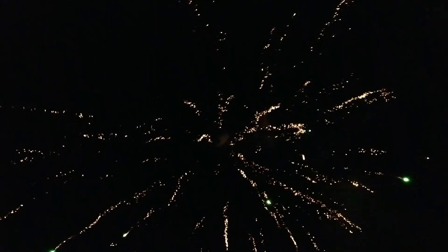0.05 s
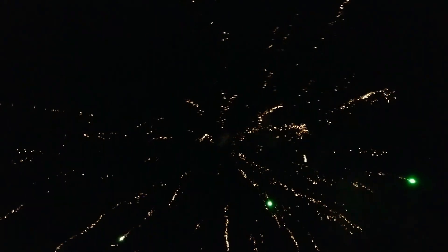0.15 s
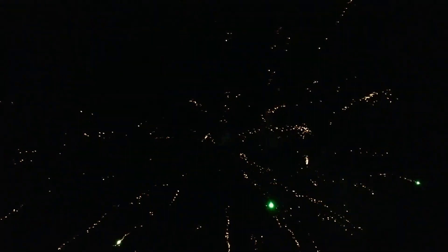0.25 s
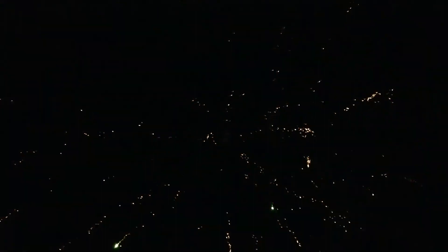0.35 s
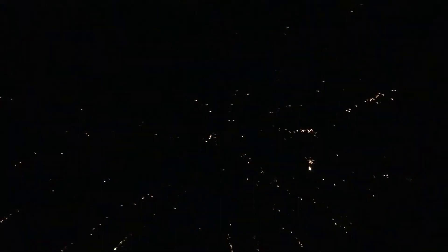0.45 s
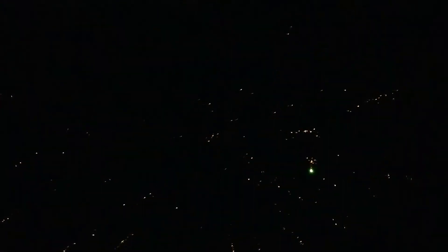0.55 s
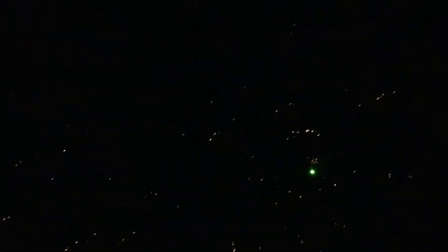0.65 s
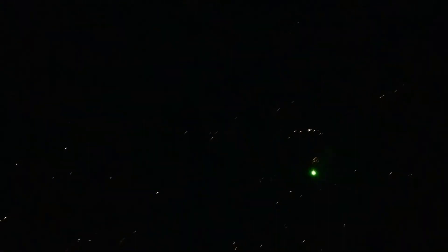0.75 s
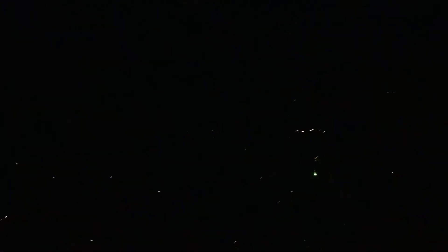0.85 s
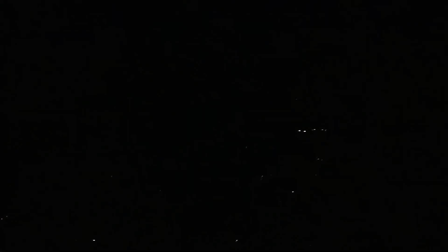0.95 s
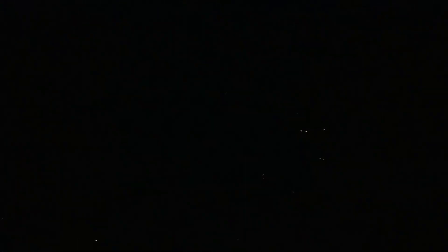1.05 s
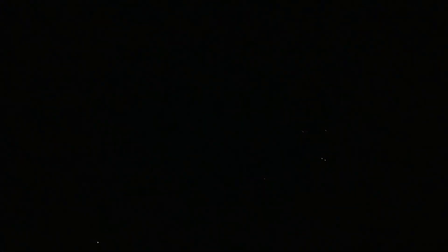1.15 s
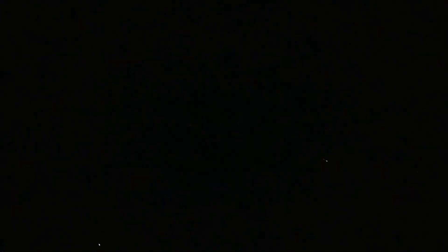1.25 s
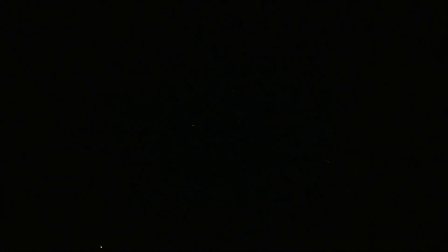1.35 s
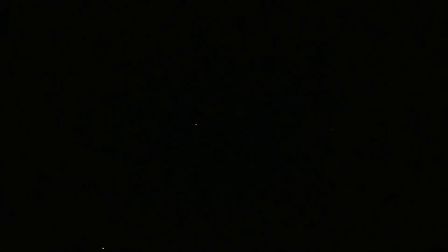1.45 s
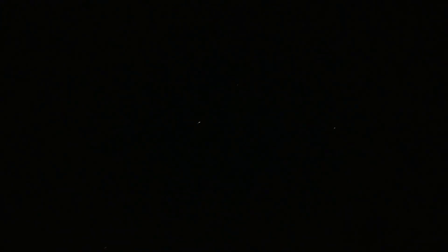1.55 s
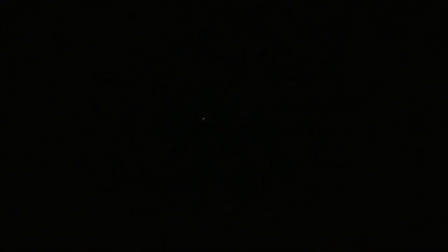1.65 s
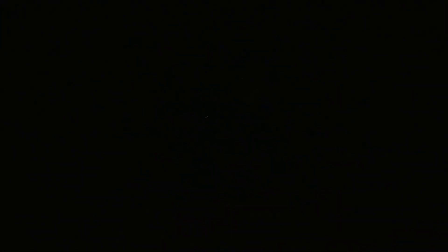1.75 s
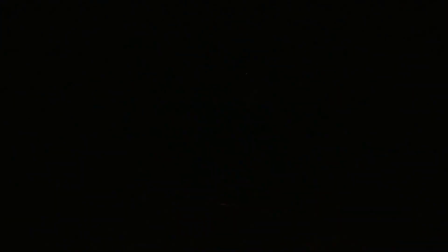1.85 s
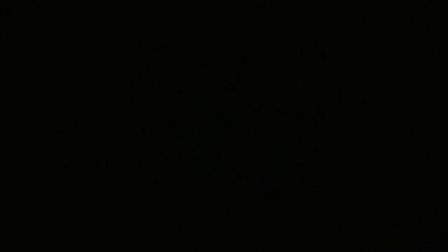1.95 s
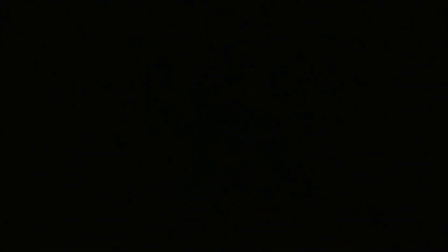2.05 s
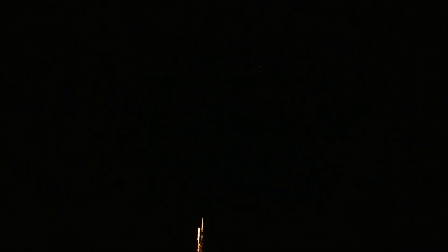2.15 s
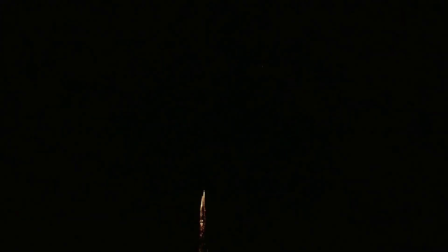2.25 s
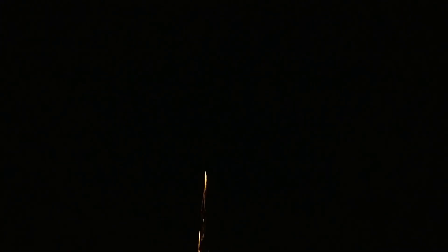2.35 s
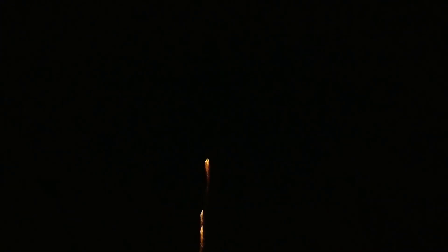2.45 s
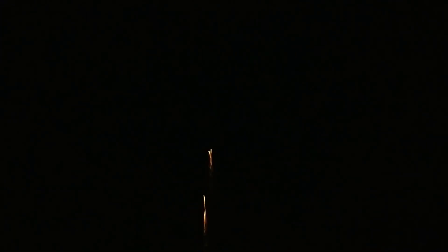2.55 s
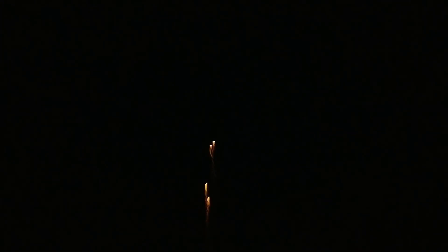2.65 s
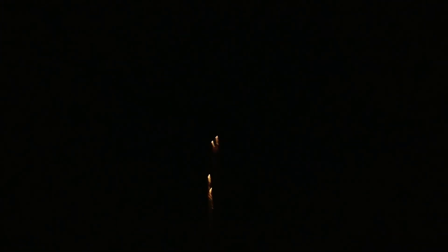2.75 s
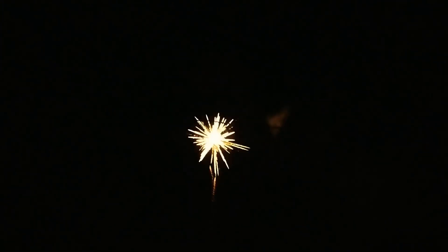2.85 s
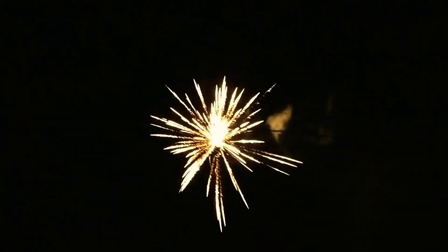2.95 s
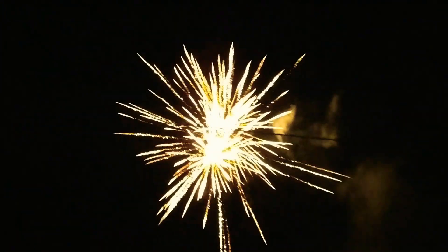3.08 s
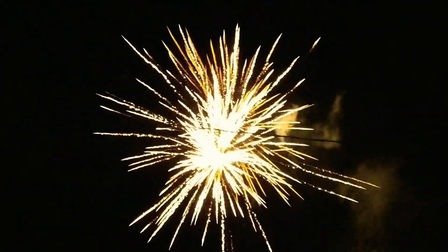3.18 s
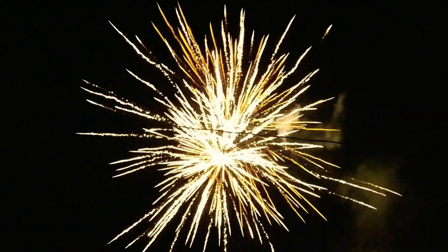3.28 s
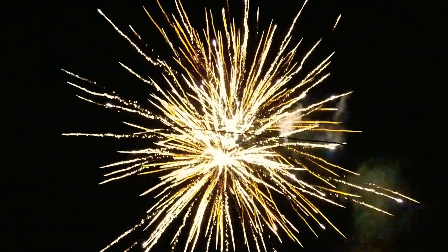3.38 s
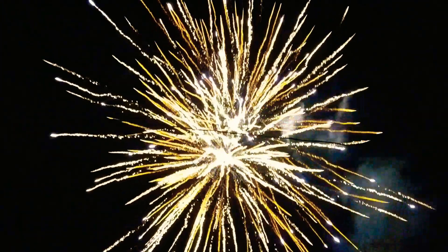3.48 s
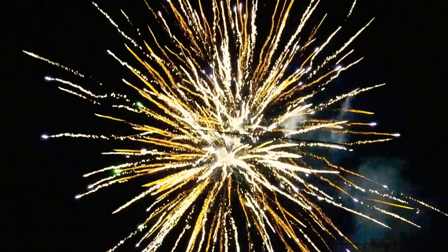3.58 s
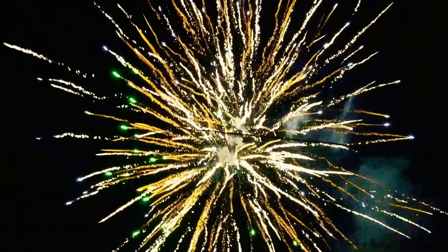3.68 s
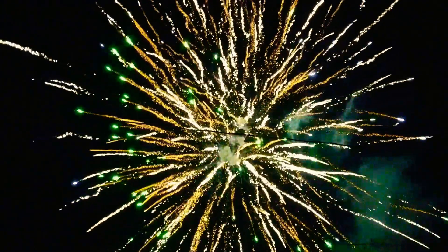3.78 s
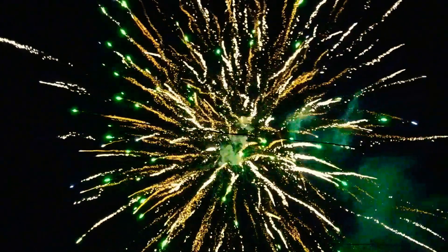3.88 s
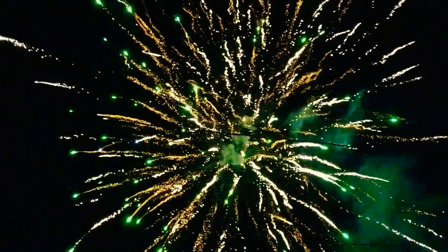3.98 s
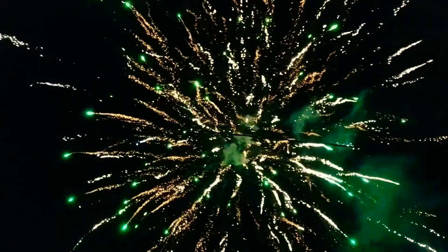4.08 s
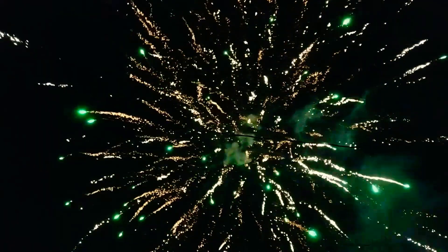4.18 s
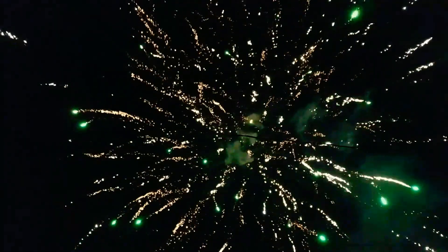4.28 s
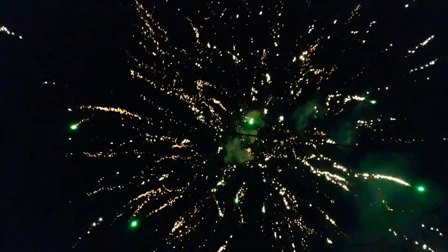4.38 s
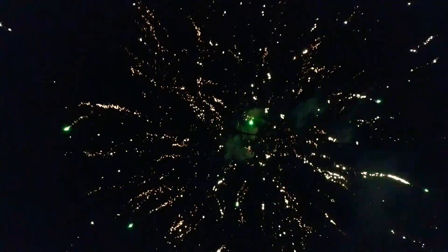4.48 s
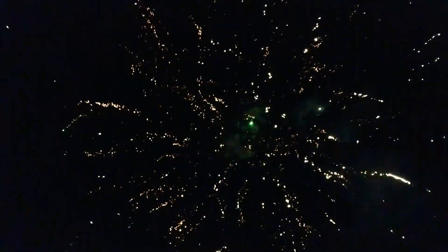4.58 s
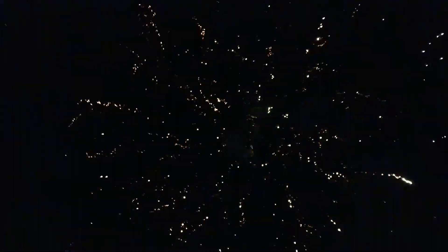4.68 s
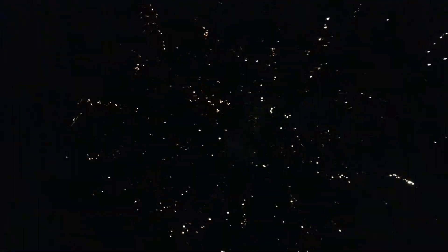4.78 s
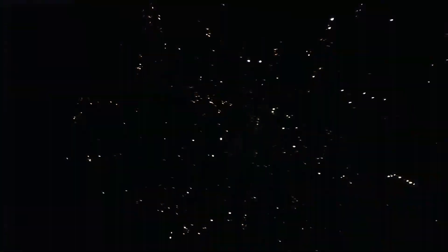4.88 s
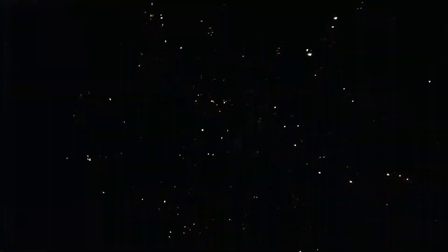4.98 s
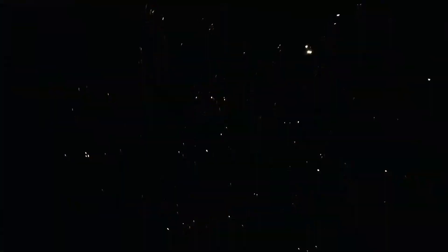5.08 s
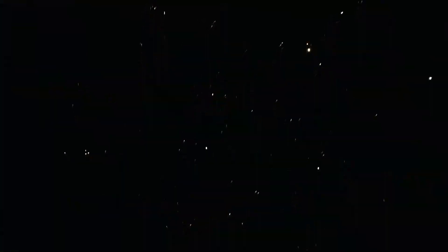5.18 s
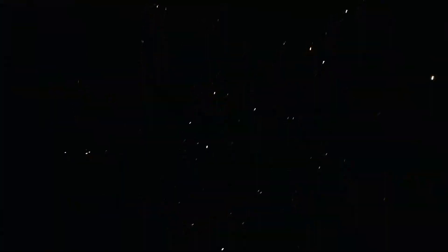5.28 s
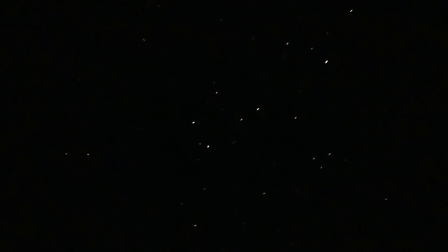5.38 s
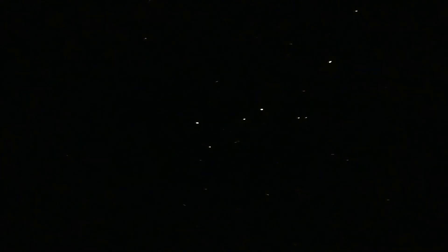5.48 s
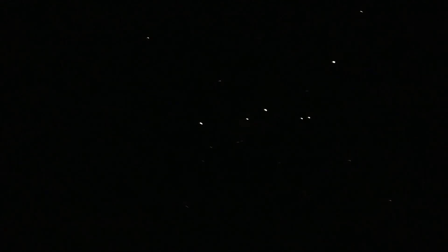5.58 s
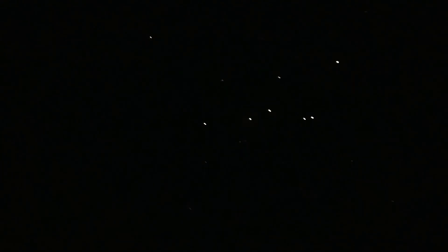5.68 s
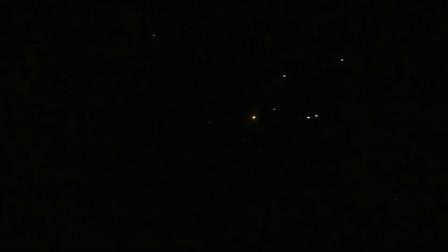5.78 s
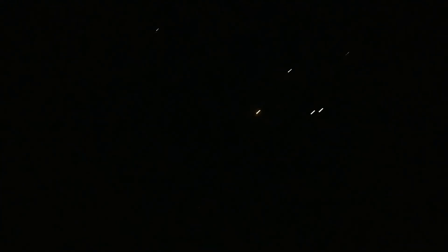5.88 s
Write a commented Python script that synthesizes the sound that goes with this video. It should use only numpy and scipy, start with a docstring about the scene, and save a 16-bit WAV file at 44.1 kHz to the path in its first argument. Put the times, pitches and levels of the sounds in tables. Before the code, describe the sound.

Night fireworks outdoors: dying rumble, a rapid run of four mortar shots, a violent cluster of distorted bangs, then long fading thunder and faint pops.

```python
"""Open country at night: four mortar tubes of a firework cake fire; a second later their shells burst overhead.
Each blast wave arrives twice, directly and off the ground; the bangs overload the microphone.
Walls answer at once as dense noise; the land rolls thunder back: it swells briefly, fades and dulls.
Burning stars and tails fizz as faint filtered noise, weak shocks pop far away, and a steady hiss lies below.
"""
import sys
import numpy as np
from scipy import signal
from scipy.fft import rfft, irfft, next_fast_len
from scipy.io import wavfile
from scipy.ndimage import uniform_filter1d

SR = 44100
rng = np.random.default_rng(int(sys.argv[2]) if len(sys.argv) > 2 else 0)


def persist_wave(psi):
    """Save psi, clipped to +-1, as 16-bit WAV."""
    counts = np.round(np.clip(psi, -1, 1) * 32767).astype(np.int16)
    wavfile.write(sys.argv[1], SR, np.atleast_2d(counts).T)


N = 261501
TIME_S = np.arange(N) / SR

# shell bursts; the first precedes the start, only its thunder is left:
# start_s [s], level_db [dB], bounce_ms [ms], bounce_share [ratio]
SHELL_BURSTS = [(-.9, 24.6, 9.4, .45), (3.0763, 28.6, 9.45, .45), (3.2123, 24, 9.7, .8),
                (3.2294, 26, 9.25, .55), (3.3344, 25, 9.35, .75)]
# mortar shots: start_s [s], level_db [dB], blast_ms [ms], bounce_ms [ms]
MORTAR_SHOTS = [(1.7656, 14, 1.8, 1.1), (1.8379, 13, 3.4, 1.45), (1.9376, 12, 3.8, 1.45),
                (2.0036, 13, 3.2, 1.5)]
# air overtones of a mortar tube: pitch_hz [Hz], level_db [dB], t60_s [s]
TUBE_MODES = [(385, -17, .03), (715, -17.5, .022), (1190, -17.5, .024), (1750, -25, .016)]
# burst thunder spectrum: freq_hz [Hz], density_db [dB per Hz]
BURST_SPECTRUM = [(30, -26), (70, -17), (130, -8), (300, .5), (560, -.5), (860, -11.5), (1150, -8),
                  (2200, -14), (3200, -24), (5000, -32), (7000, -39), (8500, -60), (16000, -75)]
# launch thunder spectrum: freq_hz [Hz], density_db [dB per Hz]
LAUNCH_SPECTRUM = [(30, -16), (70, -10), (130, 0), (240, 2), (370, -1), (500, -7), (720, -4.5), (950, -6.5),
                   (1250, -3.8), (2200, -9), (3200, -17), (7000, -32.5), (8500, -54), (16000, -70)]
# wall echo spectrum: freq_hz [Hz], density_db [dB per Hz]
WALL_SPECTRUM = [(30, -22), (100, -6), (280, 1), (550, -1), (850, -12), (1500, -16), (3000, -30),
                 (6000, -44), (8500, -62), (15000, -66)]
# burning powder spectrum: freq_hz [Hz], density_db [dB per Hz]
SIZZLE_SPECTRUM = [(30, -30), (1500, -3), (2900, 11), (4500, 4), (7000, 0), (8500, -10), (10500, 1),
                   (16000, 2.5)]
# burning stars and tails: start_s [s], length_s [s], level_db [dB]
STAR_FIZZES = [(-.3, 1.5, -59.5), (2.25, 1.0, -60.5), (3.88, .97, -55)]
# distant pops: start_s [s], level_db [dB], blast_ms [ms], treble_edge_hz [Hz], scatter_db [dB]
DISTANT_POPS = [(1.0533, -21, 2.8, 6500, -39), (1.1221, -23, 1.6, 6000, -44), (1.1795, -34, .3, 4500, -45),
                (4.7955, -21.5, 1.6, 4500, -44), (5.0165, -26, .3, 2500, -43), (5.3225, -29, .3, 2500, -36),
                (5.669, -37, .1, 5000, -48)]
# night air and microphone hiss spectrum: freq_hz [Hz], density_db [dB per Hz]
HISS_SPECTRUM = [(25, 21), (55, 31), (110, 25), (400, 16), (1000, 12), (2000, 7), (3200, 4.7), (6500, 1.5),
                 (8500, -4), (11000, 1), (16000, 5.5)]

# echo gains relative to the bang
BURST_WALL_DB, BURST_SIZZLE_DB, BURST_THUNDER_DB = -38.3, -70, -44.2
LAUNCH_WALL_DB, LAUNCH_SIZZLE_DB, LAUNCH_THUNDER_DB = -29.3, -56.5, -31.4
# thunder swells as the wave reaches more land, and fades steadily
BURST_SWELL_DB, BURST_SWELL_S, BURST_FADE_DB_PER_S = 5.8, .33, 10.3
LAUNCH_SWELL_DB, LAUNCH_SWELL_S, LAUNCH_FADE_DB_PER_S = 7.6, .42, 23.5
TUBE_SPREAD = .015  # relative pitch spread between tubes
THUMP_LEAD_S, THUMP_DB = .004, -25  # ground path
SLAP_DELAY_S, SLAP_DB = .13, -22  # far wall
FIZZ_RAMP_S, FIZZ_LOW_HZ = .16, 1500
HISS_DB = -56.3
MIC_LOW_HZ, MIC_CEILING, SOFTEN_HZ, TOP_HZ = 112, .7, 8500, 15900


def bursts():
    """Shells burst high up, so their sound reaches every wall and rolls on for seconds."""
    direct, echoes = np.zeros((2, N))
    for start_s, level_db, bounce_ms, share in SHELL_BURSTS:
        shock = bang(level_db, blast_ms=.47, bounce_ms=bounce_ms, share=share,
                     front_hz=3000, ring_hz=78, q=1.6, ragged=.75)
        roll = thunder(BURST_SPECTRUM, BURST_SWELL_DB, BURST_SWELL_S, BURST_FADE_DB_PER_S,
                       air_db_per_s=3.15, patchy_db=1.3)
        wall = walls(delay_s=.012, hold_s=.028, t60_s=.14)
        add(direct, start_s, shock)
        add(echoes, start_s, gain(level_db + BURST_WALL_DB) * wall)
        add(echoes, start_s, gain(level_db + BURST_SIZZLE_DB) * sizzle(t60_s=.55))
        add(echoes, start_s, gain(level_db + BURST_THUNDER_DB) * roll)
    return direct, echoes


def launches():
    """Lift charges ring their tubes; a thump through the ground runs ahead, and a far wall slaps back."""
    direct, echoes = np.zeros((2, N))
    for start_s, level_db, blast_ms, bounce_ms in MORTAR_SHOTS:
        shock = bang(level_db, blast_ms, bounce_ms, share=.58,
                     front_hz=3800, ring_hz=238, q=1.35, ragged=.55)
        shot = shock + gain(level_db) * tube_ring(len(shock))
        dull = butter(shot, 900, "low")
        roll = thunder(LAUNCH_SPECTRUM, LAUNCH_SWELL_DB, LAUNCH_SWELL_S, LAUNCH_FADE_DB_PER_S,
                       air_db_per_s=3.7, patchy_db=1.5)
        wall = walls(delay_s=.003, hold_s=.004, t60_s=.09)
        add(direct, start_s, shot)
        add(direct, start_s - THUMP_LEAD_S, gain(THUMP_DB) * dull)
        add(direct, start_s + SLAP_DELAY_S, gain(SLAP_DB) * dull)
        add(echoes, start_s, gain(level_db + LAUNCH_WALL_DB) * wall)
        add(echoes, start_s, gain(level_db + LAUNCH_SIZZLE_DB) * sizzle(t60_s=.3))
        add(echoes, start_s, gain(level_db + LAUNCH_THUNDER_DB) * roll)
    return direct, echoes


def tube_ring(n):
    """Air modes of one tube, detuned together, each a decaying sine."""
    t = TIME_S[:n]
    tuning = 1 + TUBE_SPREAD * rng.standard_normal()
    ring = np.zeros(n)
    for pitch_hz, level_db, t60_s in TUBE_MODES:
        ring += np.sin(2 * np.pi * pitch_hz * tuning * t) * gain(level_db - 60 * t / t60_s)
    return ring


def bang(level_db, blast_ms, bounce_ms, share, front_hz, ring_hz, q, ragged):
    """A ragged blast and its bounce off the ground; the pushed air swings back a few times."""
    wave = blast(blast_ms, front_hz)
    t = TIME_S[:len(wave)]
    # turbulence behind the front
    turbulence = np.exp(-t / .0015) * butter(rng.standard_normal(len(t)), 3000, "low")
    wave = wave * (1 + ragged * turbulence)
    wave = wave + share * np.interp(t - bounce_ms / 1000, t, wave, left=0)
    # resonant second-order high-pass
    w = 2 * np.pi * ring_hz
    b, a = signal.bilinear([1, 0, 0], [1, w / q, w * w], SR)
    return gain(level_db) * signal.lfilter(b, a, wave)


def blast(blast_ms, front_hz):
    """Blast wave: a steep shock front, falling pressure, then suction."""
    u = TIME_S[:4096] * 1000 / blast_ms
    return butter((1 - u) * np.exp(-u), front_hz, "low")


def walls(delay_s, hold_s, t60_s):
    """Dense first echoes off the nearest walls: noise that holds, then decays."""
    n = 16384
    t = TIME_S[:n] - delay_s
    onset = np.clip(t / .002, 0, 1)
    decay_db = -60 * np.maximum(t - hold_s, 0) / t60_s
    return noise(WALL_SPECTRUM, n) * onset * gain(decay_db)


def thunder(spectrum, swell_db, swell_s, fade_db_per_s, air_db_per_s, patchy_db):
    """Countless echoes off the land build, then fade; air takes air_db_per_s more at 1 kHz, and more above."""
    n = 140000
    hz, t, frames = signal.stft(noise(spectrum, n), SR, nperseg=512)
    build_db = swell_db * np.minimum(t / swell_s - 1, 0)
    loss_db = (fade_db_per_s + air_db_per_s * (hz[:, None] / 1000) ** 1.5) * t
    tail = signal.istft(frames * gain(build_db - loss_db), SR)[1][:n]
    # single slopes and tree lines stand out
    return tail * gain(patchy_db * walk(35, n))


def sizzle(t60_s):
    """Thin hiss of powder flaring after a bang: decaying noise."""
    n = 16384
    return noise(SIZZLE_SPECTRUM, n) * gain(-60 * TIME_S[:n] / t60_s)


def fizzes():
    """Burning stars and tails: a faint bright hiss that flares up, holds and dies."""
    flame = np.zeros(N)
    for start_s, length_s, level_db in STAR_FIZZES:
        inside_s = np.minimum(TIME_S - start_s, start_s + length_s - TIME_S)
        flame += gain(level_db) * np.clip(.5 + inside_s / FIZZ_RAMP_S, 0, 1)
    return flame * butter(hiss(), FIZZ_LOW_HZ, "high")


def pops():
    """Small distant charges: a lone weak shock each, with a faint scatter behind it."""
    out = np.zeros(N)
    for start_s, level_db, blast_ms, treble_edge_hz, scatter_db in DISTANT_POPS:
        scatter = butter(walls(delay_s=.002, hold_s=.012, t60_s=.25), 2500, "high")
        add(out, start_s, -gain(level_db) * blast(blast_ms, treble_edge_hz))
        add(out, start_s, gain(scatter_db) * scatter)
    return out


def hiss():
    """Steady night air and microphone hiss of rms near 1."""
    return noise(HISS_SPECTRUM, next_fast_len(N))[:N]


def noise(spectrum, n):
    """Gaussian noise of rms near 1, shaped to the spectrum."""
    hz, density_db = np.transpose(spectrum)
    bin_hz = np.arange(n // 2 + 1) * SR / n
    shape = gain(np.interp(np.log(bin_hz + 1), np.log(hz), density_db))
    return irfft(rfft(rng.standard_normal(n)) * shape, n) / np.sqrt(np.mean(shape ** 2))


def walk(points_per_s, n):
    """Random wander, straight between points, with a spread near 1."""
    points = rng.standard_normal(2048)
    return 1.2 * np.interp(TIME_S[:n] * points_per_s, np.arange(len(points)), points)


def gain(db):
    """Decibels to amplitude ratio."""
    return 10 ** (np.asarray(db) / 20)


def butter(x, hz, kind, order=2):
    """Causal Butterworth low-pass or high-pass."""
    return signal.sosfilt(signal.butter(order, hz, kind, fs=SR, output="sos"), x)


def add(out, start_s, x):
    """Mix x into out from start_s, which may lie before the start."""
    i = int(round(start_s * SR))
    x, i = x[max(-i, 0):], max(i, 0)
    out[i:i + len(x)] += x[:N - i]


def scene():
    """Shock fronts, thinned by the microphone's bass roll-off, over echoes, fizzing and hiss."""
    direct, echoes = np.add(launches(), bursts())
    shocks = butter(direct + pops(), MIC_LOW_HZ, "high")
    sound = shocks + echoes + fizzes() + gain(HISS_DB) * hiss()
    return np.array([sound, sound])


def record(dry):
    """Bangs hit the microphone's ceiling, the top is softened; left and right differ only around overloads."""
    flat = dry / (1 + (dry / MIC_CEILING) ** 8) ** (1 / 8)
    soft = butter(flat, SOFTEN_HZ, "low", order=1)
    over = 1. * (np.abs(dry[0]) > MIC_CEILING)
    overload = np.minimum(10 * uniform_filter1d(over, size=200), 1)
    # delayed treble, opposite sign in each channel
    crack = butter(np.roll(soft[0], 16), 4500, "high", order=8)
    side = gain(-10) * overload * crack
    stereo = soft + side * np.array([[1], [-1]])
    return signal.sosfilt(signal.ellip(8, .2, 70, TOP_HZ, fs=SR, output="sos"), stereo)


dry = scene()
out = record(dry)
persist_wave(out)
```